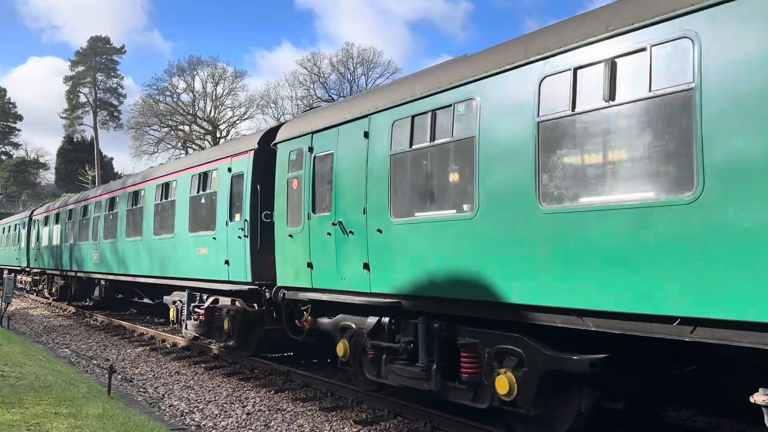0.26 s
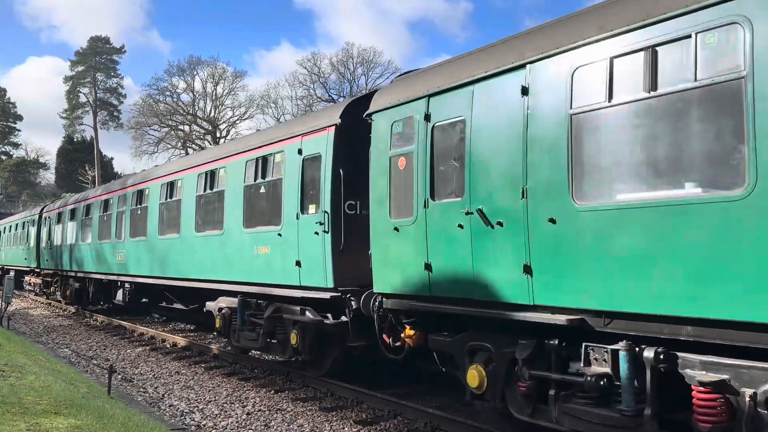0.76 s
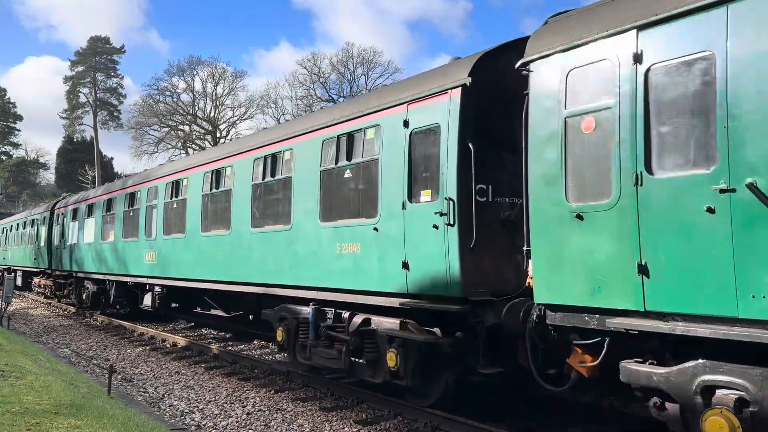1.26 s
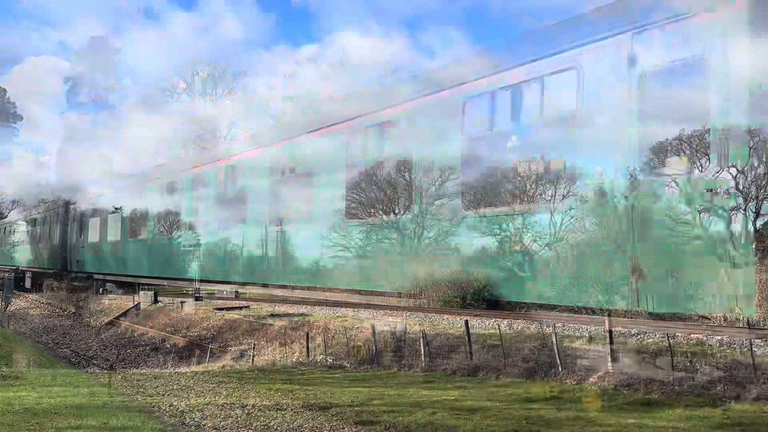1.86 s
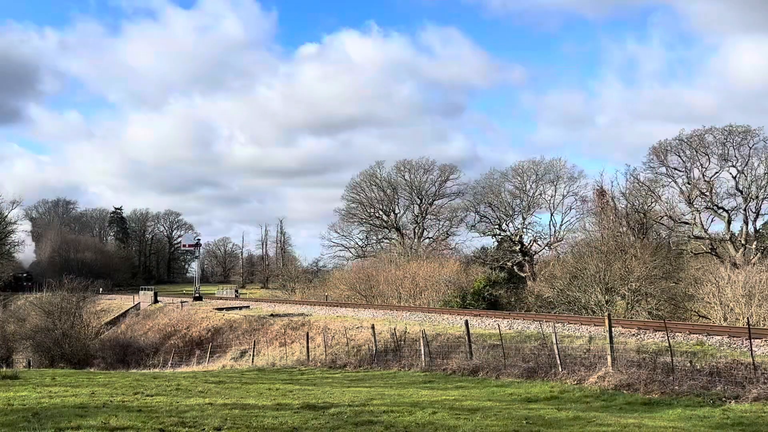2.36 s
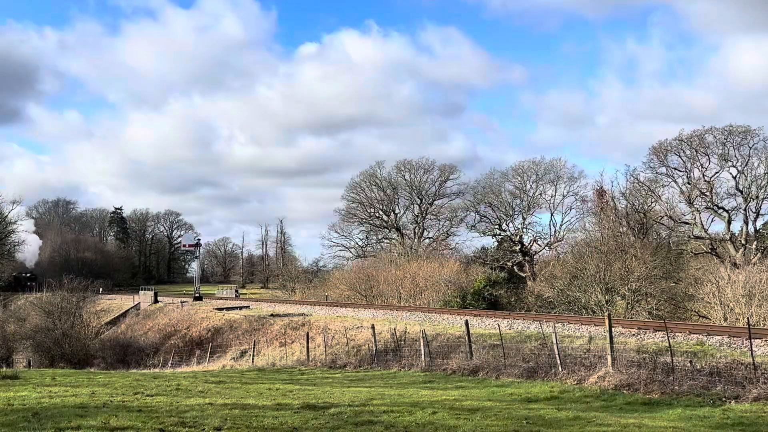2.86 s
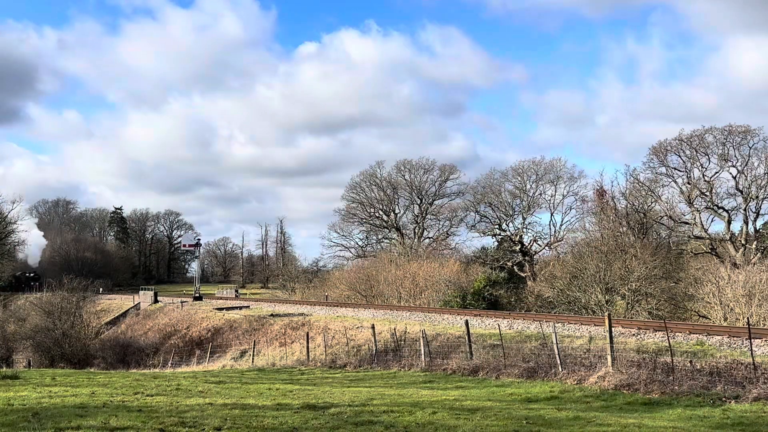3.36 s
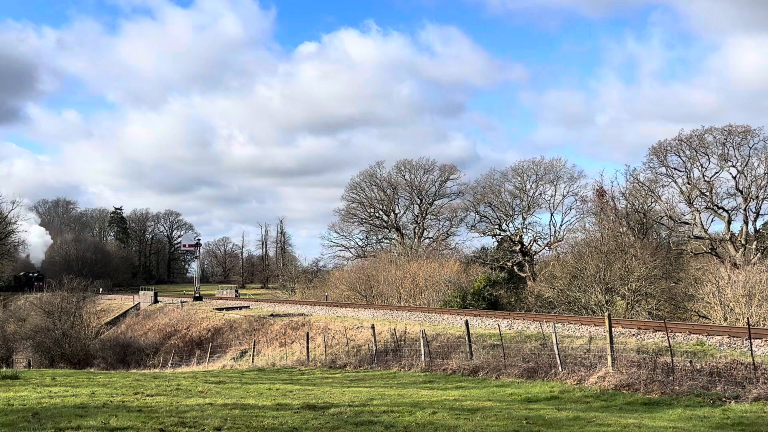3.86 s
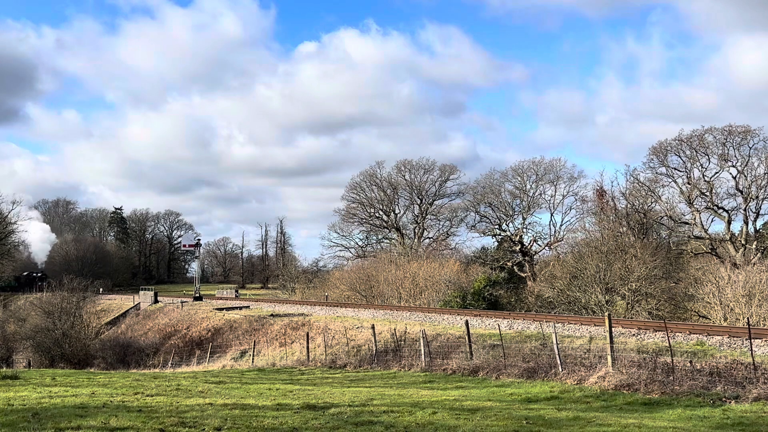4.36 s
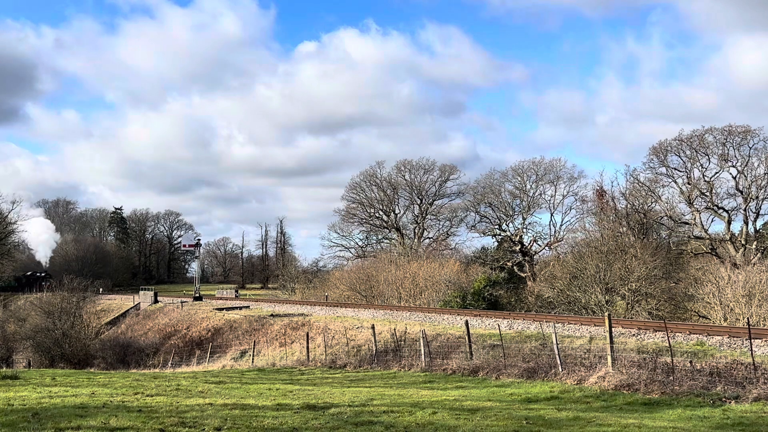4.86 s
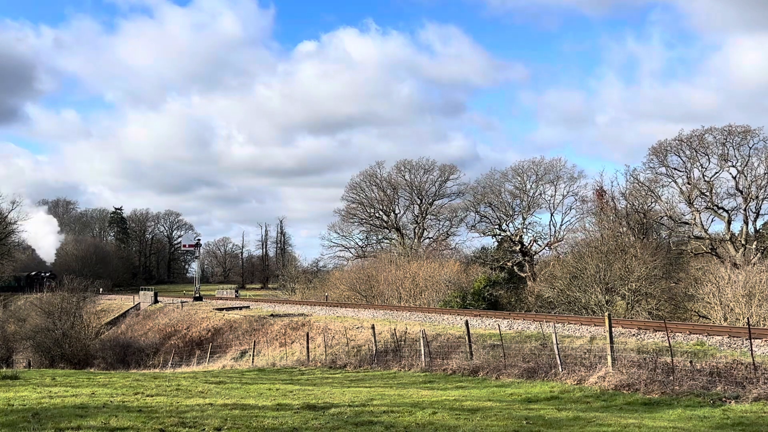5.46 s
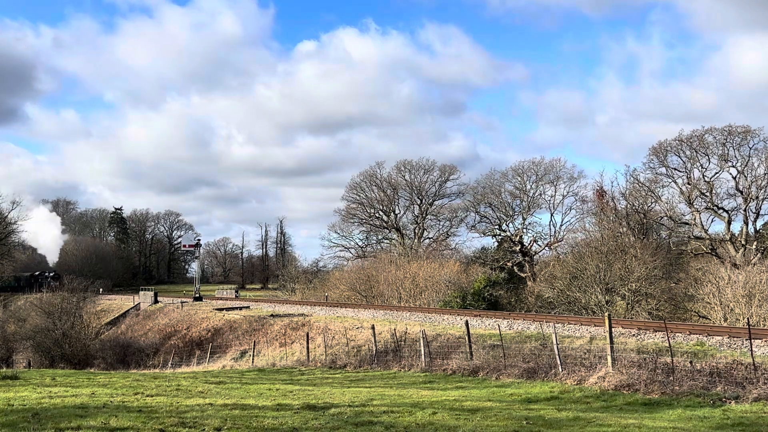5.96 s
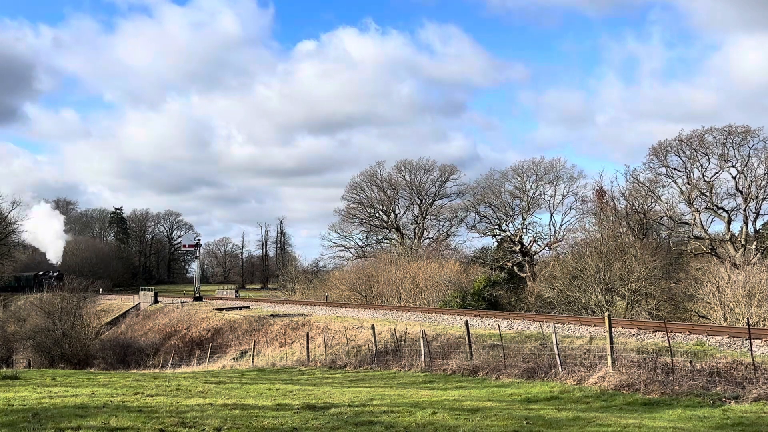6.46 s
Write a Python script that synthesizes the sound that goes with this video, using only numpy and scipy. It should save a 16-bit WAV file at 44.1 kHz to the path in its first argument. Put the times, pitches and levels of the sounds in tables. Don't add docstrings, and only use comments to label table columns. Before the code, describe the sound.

Heavy coach wheels roar, squeal and clunk nearby for two seconds, giving way to far, regular steam chuffs, small birds and gusts buffeting the microphone.

```python
import sys
import numpy as np
from scipy import signal
from scipy.fft import rfft, irfft
from scipy.io import wavfile
from scipy.ndimage import uniform_filter1d

SR = 44100
rng = np.random.default_rng(int(sys.argv[2]) if len(sys.argv) > 2 else 0)


def gain_from_db(level_db):
    decades = np.asarray(level_db, float) / 20
    return 10 ** decades


def unload_wav(signal):
    wavfile.write(
        sys.argv[1],
        SR,
        np.round(np.clip(np.atleast_2d(signal).T, -1, 1) * 32767).astype(np.int16),
    )


N = 295470
TIME = np.arange(N) / SR

RUMBLE_SPECTRUM = [(25, -18.5), (59, 1.5), (75, -8), (87, -3.5), (102, -7), (124, -11.5), (198, -11),
                   (290, -13.5), (435, -29), (520, -27), (800, -70)]
DRONE_SPECTRUM = [(220, -24), (380, 0.5), (443, -9.5), (641, -1), (756, -4), (843, -4), (984, -4.5),
                  (1250, -12), (1800, -57)]
ROAR_SPECTRUM = [(590, -47), (1000, -9), (1530, -5), (2100, -8.5), (2900, -9.5), (4230, -13.5), (4900, -12),
                 (5970, -12.5), (9700, -23.5), (10300, -39), (10700, -78), (12000, -72), (12500, -35),
                 (14900, -31), (15700, -43)]
FLANGE_SPECTRUM = [(4300, 2.5), (4900, 9), (5800, 5.5), (6800, 5.5), (7700, 2.5), (9000, -25)]
KNOCK_SPECTRUM = [(200, -4.0), (350, 13.5), (800, 7.5), (1500, 2.5), (2600, -13.0), (8000, -37)]
# (time [s], nearness [0-1])
BOGIES = [
    (0, 0.18),
    (.2, 0.15),
    (.7, 0.1),
    (1.3, 0.6),
    (1.55, 0.83),
    (1.9, 1),
]
# (far level [dB], gain at nearness 1 [dB])
BOOM_DB, RUMBLE_DB, DRONE_DB, ROAR_DB = (-20, 0), (-23, 4), (-42, 9.5), (-36, 0.2)
# (frequency [Hz], width [Hz], level [dB])
WHEEL_MODES = [(645, 45, -51), (769, 40, -49), (1399, 60, -58), (2005, 60, -58), (2131, 70, -57)]
# (time [s], length [s], frequency [Hz], level [dB])
SQUEALS = [
    (0, 0.044, 6750, -29.5),
    (0.074, 0.043, 5730, -36),
    (0.177, 0.021, 5840, -36.5),
    (0.305, 0.06, 5820, -33.5),
    (0.388, 0.097, 5790, -39.5),
    (.41, 0.075, 5170, -41),
    (0.682, 0.049, 5500, -44.5),
    (0.788, 0.049, 5370, -48),
]
# (time [s], level [dB], length [s])
JOINTS = [
    (0.548, -26, 0.085),
    (1.132, -27.5, 0.084),
    (1.368, -44, 0.063),
]
# (time [s], peak level [dB], frequency [Hz])
THUD = (1.385, -11, 120)
# (frequency [Hz], left lead [rad])
COACH_PAN = [(60, 2), (110, 0.5), (200, 0.5), (700, -1), (1290, -2), (4400, 2.5), (8120, 7), (15000, -4)]
COACH_ALIKE = [(60, 1), (250, 0.89), (700, 0.45), (1200, 0.29), (2000, 0.83), (5000, 0), (8000, 0.3),
               (9500, 0.1), (12000, 0.38)]
COACH_LEAD = [(0, 0), (780, -0.8), (1460, -2.8), (1890, -6.2), (2930, -5.9), (4000, -6.2), (22050, -6.2)]
# (frequency [Hz], left minus right [dB])
FLANGE_ALIKE, FLANGE_PAN = [(4000, 0.96), (9000, 0.81)], [(4000, 2.8), (9000, 17.5)]

# (time [s], blast level [dB], chimney level [dB], chimney frequency [Hz], chimney lag [s])
BEATS = [(2.153, -38, -25, 190, 0.032), (2.428, -36, -29.5, 206, 0.035), (2.706, -40.5, -27, 202, 0.019),
         (2.959, -41.5, -21, 216.3, 0.03), (3.22, -43, -29, 199.5, 0.038),
         (3.498, -42.5, -26.5, 212.6, 0.043), (3.754, -41, -28, 195.5, 0.03),
         (4.013, -40.5, -39.5, 206.5, 0.029), (4.265, -41.5, -36.5, 203.6, 0.012),
         (4.525, -40, -28.5, 205, 0.036), (4.783, -38, -30, 204.2, 0.018), (5.037, -39, -31, 205.4, 0.025),
         (5.276, -38.5, -25.5, 209, 0.036), (5.537, -41, -23.5, 201, 0.033),
         (5.795, -40, -22.5, 190.6, 0.0098), (6.041, -43.5, -22.5, 185, 0.043),
         (6.278, -43, -24.5, 204.6, 0.032), (6.534, -38.5, -26.5, 190.5, 0.022)]
# (chimney overtone [dB], extra top hiss [dB], chimney ring [s])
BEAT_COLOUR = [(-41, 12, 0.012), (-44, -1.5, 0.036), (-43.5, -4, 0.038), (-49, -8, 0.0066), (-65, 7, 0.018),
               (-50, 5, 0.018), (-44.5, -1.5, 0.019), (-51, 3, 0.023), (-49, 1.5, 0.023),
               (-42.5, -7, 0.023), (-42, -3.5, 0.061), (-49.5, -3.5, 0.032), (-57, 1.5, 0.024),
               (-36.5, 2.5, 0.023), (-34.5, -7.5, 0.029), (-39.5, 4, 0.0077), (-52, 4, 0.042),
               (-43, -1, 0.055)]
BLAST_SPECTRUM = [(250, 17), (400, -1.5), (600, -10), (900, 4), (1400, -2), (1900, -4), (2600, -12),
                  (3400, -26)]
TOP_SPECTRUM = [(2200, -19.5), (3000, -8.5), (3700, 4), (5000, 2.5), (7330, 3.5), (7480, -23.5),
                (7600, -7.5), (8200, -3), (9500, -44)]
# (time [s], level [dB])
CARRY = [(2.1, -74.5), (3.7, -57.5), (4.1, -54), (5.4, -50.5), (5.9, -54.5), (6.6, -59)]

# (time [s], level [dB], share own to each port [dB])
BREEZE = [(1.8, -32, -9), (2.05, -49, -9), (2.25, -42, -10.5), (3.2, -40, -10), (3.45, -42, 3.5),
          (4.3, -37.5, -7), (4.75, -42.5, 1.5), (6.0, -38, 0), (6.3, -44.5, 2.5), (6.55, -38, -2),
          (6.7, -44, 2)]
# (time of top [s], rise [s], level [dB])
GUSTS = [(3.66, 0.24, -41.5), (3.83, 0.093, -40), (4.0, 0.17, -37), (4.15, 0.24, -39), (4.57, 0.63, -47),
         (4.68, 0.037, -37.5), (4.9, 0.29, -40.5), (5.06, 0.3, -38), (5.16, 0.15, -39.5),
         (5.48, 0.085, -29), (5.579, 0.13, -30), (5.671, 0.093, -24.5), (5.821, 0.11, -22.5),
         (5.93, 0.059, -37), (6.06, 0.063, -37.5), (6.44, 0.063, -33)]
WIND_SPECTRUM = [(22, -26), (40, -1), (70, 4), (110, -2.5), (160, -10), (300, -22), (500, -42.5)]
# (time [s], peak level [dB], frequency [Hz])
BUFFETS = [(3.801, -19, 133), (3.865, -23.5, 140), (4.051, -19.5, 82), (4.131, -23, 133),
           (4.145, -22.5, 70), (4.893, -24, 79), (3.63, -27, 70), (5.14, -18, 79), (5.622, -18, 78),
           (5.638, -21, 240), (5.656, -18, 66), (5.69, -22, 80), (5.742, -21.5, 70), (5.79, -17.5, 143),
           (5.816, -15, 71.5), (5.896, -26, 150), (6.436, -21, 170), (5.49, -24, 74), (6.13, -28.5, 169),
           (6.196, -29, 169)]
# (time [s], peak level [dB], frequency [Hz])
POPS = [
    (5.9, -38, 480),
    (5.4, -40, 920),
    (2.6, -34, 270),
]

# (time [s], length [s], start frequency [Hz], end frequency [Hz], top level [dB])
ROBIN = [
    (2.842, .035, 4240, 4160, -50),
    (2.957, .055, 4130, 3960, -39),
    (3.009, .012, 3950, 3720, -46),
    (3.02, .03, 3200, 3080, -54),
    (3.105, .04, 3720, 3620, -49),
    (3.147, .026, 3590, 3570, -50),
    (3.197, .02, 3650, 3700, -54),
    (3.265, .03, 3650, 3600, -61),
    (3.325, .02, 3850, 3600, -52),
    (3.345, .03, 3260, 3230, -59),
]
TIT = [
    (3.918, .02, 5240, 4920, -55),
    (2.897, .015, 3760, 3740, -58),
    (2.92, 0.027, 4050, 4050, -66),
    (3.041, 0.028, 4050, 3920, -65),
    (3.055, 0.057, 3400, 3450, -63),
    (3.17, 0.033, 3380, 3170, -59),
    (3.71, 0.027, 3830, 3750, -57),
]
WARBLER = [(2.247, .016, 5850, 5900, -63), (2.261, .024, 5900, 5300, -63), (2.283, .03, 5270, 5230, -63),
           (2.311, .014, 5250, 5450, -62), (2.275, .05, 4050, 3950, -66), (2.325, .04, 4200, 4050, -66),
           (2.405, .04, 5900, 5650, -67), (2.4, .052, 5600, 5200, -65), (2.503, .02, 4300, 4150, -60),
           (2.515, .02, 4650, 4400, -66), (2.52, .03, 3800, 3700, -60), (2.53, .045, 4350, 4250, -63),
           (2.555, .03, 4000, 3650, -53), (2.582, .018, 2600, 2680, -60), (2.607, .014, 2560, 2680, -61),
           (2.585, .025, 3850, 3950, -62), (2.636, .018, 4450, 4750, -59), (2.652, .014, 4800, 5250, -65),
           (2.64, .035, 3600, 2850, -63), (2.666, .018, 4900, 3950, -58), (2.683, .014, 4300, 3650, -61),
           (2.712, .03, 5550, 5400, -66), (2.73, .022, 3500, 4150, -61), (2.739, .008, 4600, 5200, -57),
           (2.745, .009, 5150, 4650, -51), (2.752, .031, 4100, 3550, -53), (2.774, .019, 4950, 4200, -51),
           (2.785, .02, 3500, 3900, -66), (2.845, .016, 6050, 6350, -66)]
CHIPS = [(3.865, 0.025, 6320, 5100, -56.5), (4.057, 0.013, 7140, 6200, -55),
         (4.156, 0.0075, 5700, 7200, -53), (4.17, 0.031, 7140, 6170, -56), (4.262, 0.0064, 5940, 7200, -54),
         (4.281, 0.037, 7180, 6000, -51.5), (4.315, 0.02, 6870, 6000, -61), (4.03, 0.0096, 7070, 6500, -59),
         (5.443, 0.011, 8950, 8350, -64), (5.454, 0.028, 8300, 7650, -63), (6.446, 0.085, 6500, 5100, -66)]
WHISTLES = [(2.27, .17, 8300, 8850, -77), (3.55, 0.07, 4130, 4600, -70), (5.2, .1, 4950, 5100, -69),
            (4.06, .11, 946, 1180, -55.5), (4.157, .125, 4180, 4930, -60), (4.27, 0.1, 4880, 4900, -66),
            (4.36, 0.22, 4830, 4780, -74), (4.45, 0.18, 5280, 5400, -72), (4.83, 0.12, 5000, 4950, -65),
            (5.128, 0.081, 5080, 4800, -62), (5.638, 0.12, 4880, 4800, -76), (5.93, 0.19, 4730, 4650, -70),
            (6.28, 0.062, 6470, 5900, -68)]
# (place of top [0-1], start drop [dB], end drop [dB], bend of glide [power],
# unsteadiness [factor])
MANNER = [
    (0.36, -3, -5, 1.1, .25),
    (0, -3, -8, .35, 1),
    (0.5, -2.5, -3, 1.0, 1),
    (.02, -1, -8, 1.5, .5),
    (.45, -6, -7, .42, 1.3),
]
# (time [s], level [dB], lowest frequency [Hz], fall [s])
TICKS = [
    (3.4232, -61, 8000, .0007),
    (3.8695, -50, 4200, .0012),
    (4.521, -68, 7500, .0007),
    (6.69, -58, 6500, .0006),
]
# (time [s], length [s], frequency [Hz], level [dB])
FAR_CALLS = [(1.98, 0.063, 4080, -59.5), (2.1, 0.046, 8240, -67.5), (2.18, 0.091, 8150, -66.5),
             (2.2, 0.18, 8800, -77), (3.6, .1, 3400, -74), (6.62, 0.026, 1750, -52),
             (4.644, 0.18, 3600, -67.5), (4.694, 0.08, 5800, -66.5), (5.5, 0.17, 4970, -59.5),
             (5.0, 0.2, 4900, -67), (5.36, 0.1, 6300, -61), (5.26, .04, 5300, -60), (5.265, .04, 4000, -62),
             (5.33, .06, 3300, -68), (5.44, .06, 3700, -67.5), (2.65, .06, 4700, -63.5),
             (2.527, 0.089, 4100, -62), (2.9, 0.089, 3900, -63), (2.7, .08, 3900, -62),
             (2.6, .08, 4300, -61.5), (4.753, 0.068, 3650, -63)]

FIELD_SPECTRUM = [(120, -40), (170, 4.5), (270, -9.5), (400, -12.5), (500, -22), (900, -16.5), (1300, -20),
                  (1850, -21), (2600, -30.5), (5400, -34.5), (7340, -38), (7470, -66), (9000, -94)]
# (frequency [Hz], width [Hz], level [dB])
FIELD_RINGS = [(809, 84, -11), (1027, 60, -15.5), (1820, 63, -14), (3390, 81, -25), (3664, 72, -22.5),
               (3950, 45, -23.5), (4920, 140, -32.5), (5200, 75, -28.5), (6850, 100, -24.5)]
# (frequency [Hz], left lead [rad])
FIELD_PAN = [(60, -1), (380, 1), (700, 5.5), (1290, -1), (2380, -3.5), (4400, 1.5), (8120, -0.5)]
FIELD_ALIKE = [(150, 0.91), (640, 0.82), (1400, 0.47), (2200, 0.74), (4200, 1), (6200, 1), (7000, 0),
               (9000, 0.3)]
FIELD_LEAD = [(0, 0), (800, .5), (1550, 1.4), (1890, .6), (3000, .2), (22050, 0)]

AIR_SPECTRUM = [(7500, -33.5), (7590, 7.5), (8300, 6), (9900, -4.5), (10300, -47)]
SKY_SPECTRUM = [(12000, -31.5), (12400, -0.5), (14200, 3), (14900, -5.5), (15800, -24)]
# (time of top [s], rise [s], added share [1])
SKY_SWELLS = [
    (3.64, .25, 1.0),
    (3.88, .04, 1.5),
    (5.0, .15, 1.0),
    (5.8, 0.21, 0.83),
]
# (time [s], length [s], lowest frequency [Hz])
BAND_GAPS = [(2.06, .3, 8900), (2.95, .03, 8500), (4.035, .05, 8000), (4.17, .05, 7900), (4.22, .04, 9000),
             (4.27, .1, 7600), (4.51, .045, 7600), (5.24, .04, 8300), (5.33, .2, 9000), (6.19, .05, 8300),
             (6.36, .045, 7500)]


def rms_one(x):
    return x / np.sqrt(np.mean(x ** 2) + 1e-20)


def in_time(rows):
    s, *columns = np.transpose(rows)
    return [np.interp(TIME, s, c) for c in columns]


def at_hz(points, hz):
    table = np.array(points)
    return np.interp(np.log(hz), np.log(table[:, 0]), table[:, 1])


def drift(rate_hz):
    r = np.exp(-80 * np.pi * rate_hz / SR)
    slow = signal.lfilter([1], [1, -2 * r, r * r], rng.standard_normal(N // 40 + 2002))[2000:]
    return np.interp(np.arange(N) / 40, np.arange(len(slow)), rms_one(slow))


def resonate(x, hz, width_hz):
    r = np.exp(-np.pi * width_hz / SR)
    return signal.lfilter([1, 0, -1], [1, -2 * r * np.cos(2 * np.pi * hz / SR), r * r], x)


def noise(spectrum, alike, pan, patchy_db, rate_hz):
    hz = np.maximum(np.arange(N // 2 + 1) * SR / N, 1)
    mid, side = rfft(rng.standard_normal((2, N)))
    coherence = np.clip(at_hz(alike, hz), 0, .999)
    pair = np.sqrt(1 + coherence) * mid + np.sqrt(1 - coherence) * side * [[1], [-1]]
    pair = pair * gain_from_db(at_hz(spectrum, hz) + at_hz(pan, hz) / 2 * [[1], [-1]])
    out = 0
    for octave in np.arange(np.log2(spectrum[0][0]), np.log2(spectrum[-1][0]) + .5, .5):
        band = np.clip(1 - 2 * abs(np.log2(hz) - octave), 0, 1)
        out = out + gain_from_db(patchy_db * drift(rate_hz)) * irfft(pair * band, N)
    return rms_one(out)


def hump(start, rise, fall):
    t = TIME - start
    return np.sin(np.pi / 2 * np.clip(t / rise, 0, 1)) ** 2 * np.exp(-np.clip(t - rise, 0, 9) / fall)


def lead(pair, table):
    turn = np.exp(1j * np.interp(np.arange(N // 2 + 1) * SR / N, *np.transpose(table)))
    return np.array([irfft(rfft(pair[0]) * turn, N), pair[1]])


def body_boom(white):
    boom_hz, width_hz = 75.9, 48
    phase = 2 * np.pi * np.cumsum(boom_hz + 3.43 * drift(9.9)) / SR
    steady = np.sin(phase) * np.sqrt(2) * gain_from_db(1.0 * drift(8.9))
    return steady + 0.098 * rms_one(resonate(white, boom_hz, width_hz))


def rolling_wheels(near):
    rumble_db, drone_db, roar_db = (db + gain_db * near for db, gain_db in (RUMBLE_DB, DRONE_DB, ROAR_DB))
    rumble = noise(RUMBLE_SPECTRUM, COACH_ALIKE, COACH_PAN, patchy_db=0.0, rate_hz=9)
    drone = noise(DRONE_SPECTRUM, COACH_ALIKE, COACH_PAN, patchy_db=-0.5, rate_hz=7.9)
    roar = noise(ROAR_SPECTRUM, COACH_ALIKE, COACH_PAN, patchy_db=2.0, rate_hz=9.3)
    wheels = gain_from_db(rumble_db) * rumble + gain_from_db(drone_db) * drone + gain_from_db(roar_db) * roar
    for hz, width_hz, db in WHEEL_MODES:
        mode = rms_one(resonate(drone + roar, hz, width_hz))
        wheels += gain_from_db(db + 4.5 * near + 2.8 * drift(5.2)) * mode
    return wheels


def joints_and_thud():
    knock = noise(KNOCK_SPECTRUM, COACH_ALIKE, COACH_PAN, patchy_db=0.0, rate_hz=6.7)
    joints = sum(gain_from_db(db) * hump(s - .01, 0.024, length * 0.5) for s, db, length in JOINTS)
    s, db, hz = THUD
    thud = gain_from_db(db) * hump(s - .004, 0.0016, 0.013) * np.cos(2 * np.pi * hz * (TIME - s - .002))
    return joints * knock + thud


def flange_squeal(white):
    hiss_db = -33 - 9 * TIME - 83 * np.maximum(TIME - 1.12, 0)
    hiss = gain_from_db(hiss_db) * noise(FLANGE_SPECTRUM, FLANGE_ALIKE, FLANGE_PAN, patchy_db=2.0, rate_hz=14)
    flares = 0
    for s, length, hz, db in SQUEALS:
        flares = flares + gain_from_db(db) * hump(s - .02, 0.033, length * 0.84) * rms_one(resonate(white, hz, 100))
    left, right = hiss + flares * gain_from_db([[3.5], [-3.5]])
    return np.array([np.roll(left, 15), right])


def coaches():
    near, = in_time(BOGIES)
    fade = np.clip((2.102 - TIME) / 0.61, 0, 1)
    white = rng.standard_normal(N)
    boom_db = BOOM_DB[0] + BOOM_DB[1] * near
    out = fade ** 1.18 * gain_from_db(boom_db) * body_boom(white) + fade ** 1.16 * rolling_wheels(near)
    out = lead(out + joints_and_thud(), COACH_LEAD)
    return (out + flange_squeal(white)) * (TIME < 3)


def steam_blast():
    pipe_hz, feedback = 212, 0.5
    blast = noise(BLAST_SPECTRUM, FIELD_ALIKE, FIELD_PAN, patchy_db=1.0, rate_hz=41)
    round_trip = np.exp(-2j * np.pi * np.arange(N // 2 + 1) * SR / N / pipe_hz)
    blast = rms_one(irfft(rfft(blast) / (1.5 - feedback * round_trip), N))
    blast = blast / np.sqrt(uniform_filter1d(blast.mean(axis=0) ** 2, size=500) + .05)
    return rms_one(blast) * gain_from_db(2.2 * drift(200))


def engine():
    rise_s, chimney_rise_s, top_lead_s = 0.041, 0.034, 0.007
    blast = steam_blast()
    top = noise(TOP_SPECTRUM, FIELD_ALIKE, FIELD_PAN, patchy_db=1.5, rate_hz=12)
    out, turns = np.zeros((2, N)), rng.random((len(BEATS), 2))
    wobble, ragged = 5.5 * np.cumsum(drift(39.12)) / SR, gain_from_db(2.0 * drift(57))
    for beat, colour, (turn, over_turn) in zip(BEATS, BEAT_COLOUR, turns):
        s, blast_db, chimney_db, hz, lag = beat
        over_db, extra_db, ring_s = colour
        top_db = np.interp(s, *np.transpose(CARRY)) + 1.7 * (blast_db + 36.5) + extra_db
        puff = hump(s + 0.018 - rise_s, rise_s, 0.032)
        puff = puff + 0.099 * hump(s + 0.071, 0.022, 0.24)
        column = ragged * np.sin(2 * np.pi * (hz * TIME + wobble + turn))
        overtone = np.sin(2 * np.pi * (1.95 * hz * TIME + 4 * wobble + over_turn))
        column += gain_from_db(over_db - chimney_db) * overtone
        out += puff * gain_from_db(blast_db) * blast
        out += np.roll(puff, -int(top_lead_s * SR)) * gain_from_db(top_db) * top
        out += gain_from_db(chimney_db) * hump(s + lag - chimney_rise_s, chimney_rise_s, ring_s) * column
    return out


def wind():
    breeze_db, own_db = in_time(BREEZE)
    gusts = sum(gain_from_db(db) * hump(s - rise, rise, 0.033) for s, rise, db in GUSTS)
    gust_db = 20 * np.log10(gain_from_db(breeze_db) + gusts)
    low = noise(WIND_SPECTRUM, [(30, 0.66), (300, 0.46)], FIELD_PAN, patchy_db=1.0, rate_hz=23.0)
    low = low.mean(axis=0) + gain_from_db(own_db) * (low[0] - low[1]) / 2 * [[1], [-1]]
    low = low / (uniform_filter1d(low.mean(axis=0) ** 2, size=2600) + 0.053) ** 0.18
    high = signal.sosfilt(signal.butter(2, 150, "high", fs=SR, output="sos"), low)
    brighter = gain_from_db(0.69 * (gust_db + 32.5))
    out = gain_from_db(gust_db + 0.5) * (low + (brighter - 1) * high)
    for (s, db, hz), lean_db in zip(BUFFETS, rng.uniform(-1.2, 1.6, len(BUFFETS))):
        slap = np.sin(2 * np.pi * hz * (TIME - s)) + 0.34 * high
        envelope = hump(s, 0.0056, 0.89 / hz)
        out = out + gain_from_db(db + 1.0 + lean_db * np.c_[[1, -1]]) * envelope * slap
    for s, db, hz in POPS:
        out = out + gain_from_db(db) * hump(s, 0.0048, .004) * np.sin(2 * np.pi * hz * (TIME - s))
    return out * np.clip((TIME - 1.8) / 0.41, 0, 1)


def twig_snaps():
    out, crack = np.zeros(N), 2 * np.sign(rng.standard_normal(N))
    for s, db, low_hz, fall in TICKS:
        band = signal.butter(2, [low_hz, 11000], "band", fs=SR, output="sos")
        out += gain_from_db(db) * hump(s, .0004, fall) * signal.sosfilt(band, crack)
    return out


def birds():
    out, flutter = np.zeros(N), 0.0078 * drift(80)
    broken_db = 3.0 * drift(60)
    singers = [ROBIN, TIT, WARBLER, CHIPS, WHISTLES]
    for notes, (top, start_db, end_db, bend, unsteady) in zip(singers, MANNER):
        for s, length, from_hz, to_hz, db in notes:
            u = np.linspace(0, 1, int(length * SR))
            now = slice(int(s * SR), int(s * SR) + len(u))
            edge = np.clip(np.minimum(u, 1 - u) * length / min(.005, length / 3), 0, 1)
            glide = u ** bend if bend > 1 else 1 - (1 - u) ** (1 / bend)
            hz = (from_hz + (to_hz - from_hz) * glide) * (1 + unsteady * flutter[now])
            shape_db = np.interp(u, [0, np.clip(top, .01, .99), 1], [start_db, 0, end_db])
            swell = gain_from_db(db + unsteady * broken_db[now] + shape_db)
            out[now] += np.sqrt(2) * edge * swell * np.sin(2 * np.pi * np.cumsum(hz) / SR)
    out += twig_snaps()
    echo = rng.standard_normal((2, 6000)) * np.exp(-np.arange(6000) / SR / 0.038)
    echo = rms_one(echo) / np.sqrt(6000)
    return out * gain_from_db([[-2.3], [-0.1]]) + gain_from_db(-6.5) * signal.fftconvolve(out[None], echo, axes=1)[:, :N]


def far_birds():
    white, out = rng.standard_normal(N), 0
    for s, length, hz, db in FAR_CALLS:
        call = rms_one(resonate(resonate(white, hz, 220), hz, 400))
        out = out + gain_from_db(db) * hump(s, length / 3, length * 1.1) * call
    return out


def field():
    wash = noise(FIELD_SPECTRUM, FIELD_ALIKE, FIELD_PAN, patchy_db=3.0, rate_hz=4.0)
    white = 0.45 * rng.standard_normal((2, N)) + rng.standard_normal(N)
    rings = 0
    for hz, width_hz, db in FIELD_RINGS:
        ring = rms_one(resonate(resonate(white, hz, width_hz), hz, 3 * width_hz))
        rings = rings + gain_from_db(db + 2.5 * drift(9.5)) * ring
    fade_in = np.clip((TIME - 1.9) / 0.22, 0, 1)
    return fade_in * gain_from_db(-52.5) * (gain_from_db(5.5) * wash + rings)


def faint_top():
    air = noise(AIR_SPECTRUM, FIELD_ALIKE, FIELD_PAN, patchy_db=2.5, rate_hz=6)
    out, together = 0, drift(7)
    sky_alike = [(12000, 0.92), (16000, .98)]
    sky = gain_from_db(-92.5) * noise(SKY_SPECTRUM, sky_alike, FIELD_PAN, patchy_db=5.0, rate_hz=8)
    sky = sky * (.6 + sum(share * hump(s - rise, rise, .06) for s, rise, share in SKY_SWELLS))
    for k, low_hz in enumerate(range(7400, 10400, 500)):
        sos = signal.butter(3, [low_hz, low_hz + 500], "band", fs=SR, output="sos")
        presence = np.clip(2 * (.4 * together + .8 * drift(9) + 2.3 - .3 * k), .01, 1)
        out = out + presence * signal.sosfilt(sos, air)
    air_db = -80.5 + 1.2 * (TIME - 7.0)
    return (gain_from_db(air_db) * out + sky) * (TIME > 2)


def band_gaps(x):
    hz, spectrum, out = np.arange(N // 2 + 1) * SR / N, rfft(x), x
    for s, length, from_hz in BAND_GAPS:
        gate = uniform_filter1d(1. * ((TIME > s) & (TIME < s + length)), size=400)
        out = out - gate * irfft(spectrum * ((hz > from_hz) & (hz < 11500)), N)
    return out


def scene():
    far = lead(engine() + field(), FIELD_LEAD)
    return band_gaps(coaches() + far + wind() + birds() + far_birds() + faint_top())


def top_cut(x):
    return signal.sosfilt(signal.butter(12, 15890, fs=SR, output="sos"), x)


def record(dry):
    thin = signal.sosfilt(signal.butter(4, 40, "high", fs=SR, output="sos"), dry)
    thin = signal.sosfilt(signal.cheby2(10, 60, 16300, fs=SR, output="sos"), thin)
    thin = signal.sosfilt(signal.cheby2(6, 26, [10600, 12200], "stop", fs=SR, output="sos"), thin)
    return top_cut(thin)


dry = scene()
out = record(dry)
unload_wav(out)
```